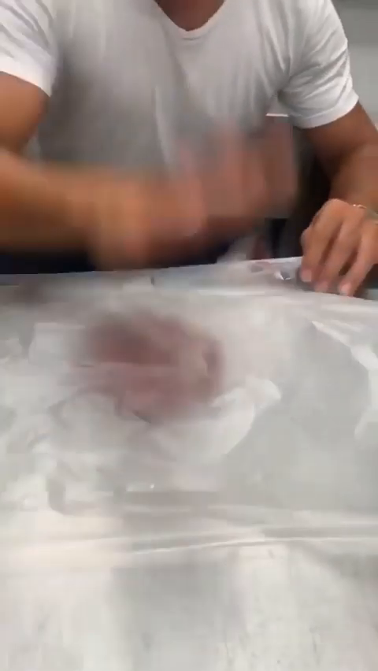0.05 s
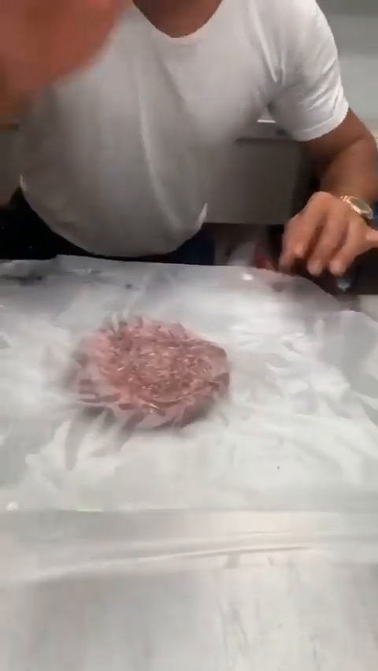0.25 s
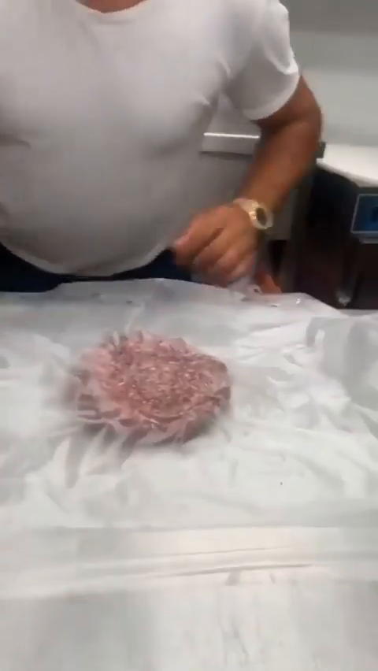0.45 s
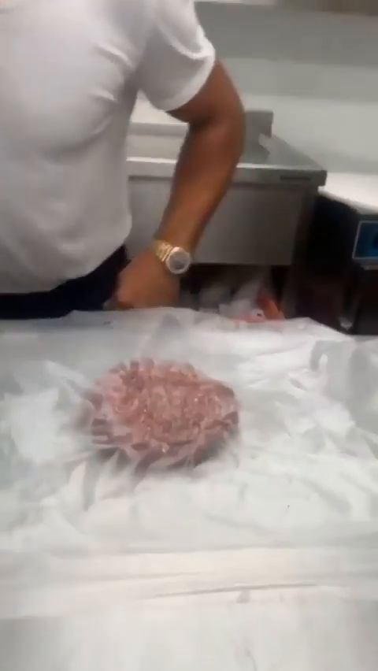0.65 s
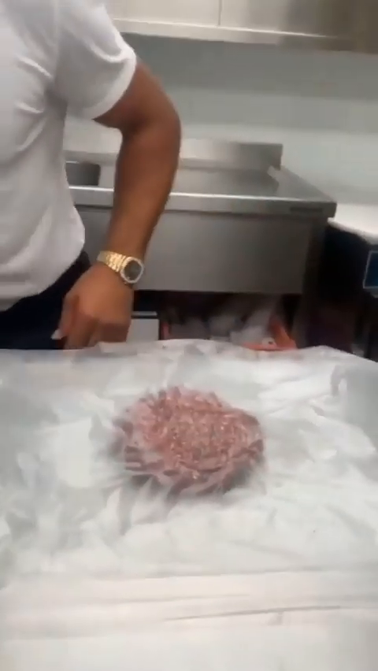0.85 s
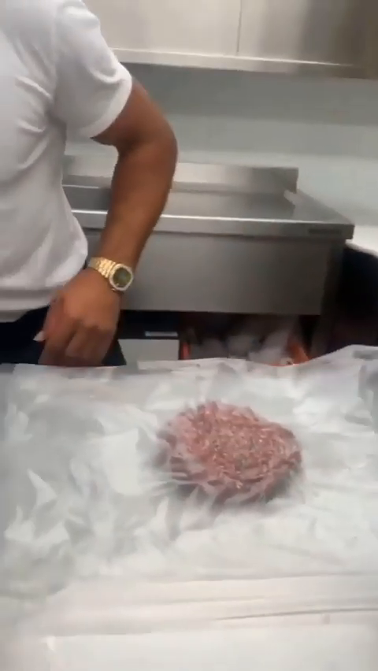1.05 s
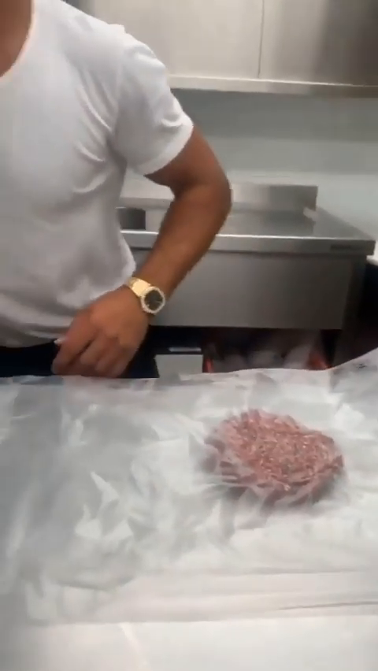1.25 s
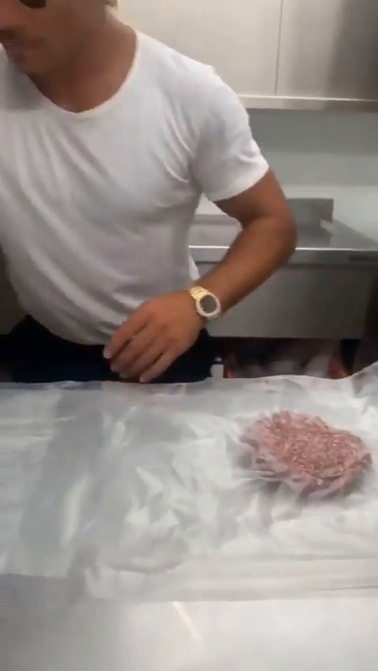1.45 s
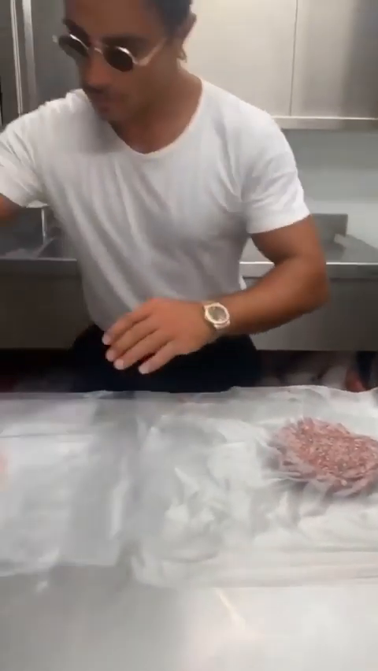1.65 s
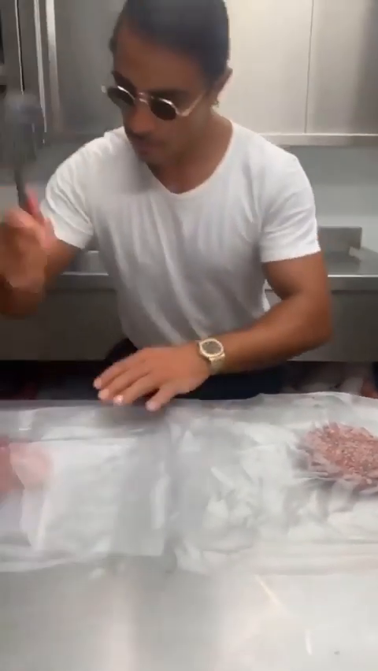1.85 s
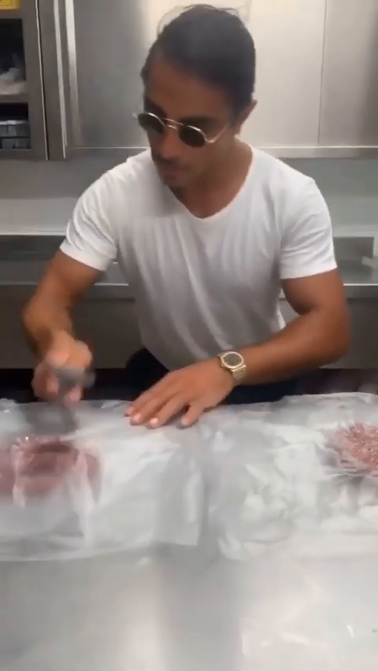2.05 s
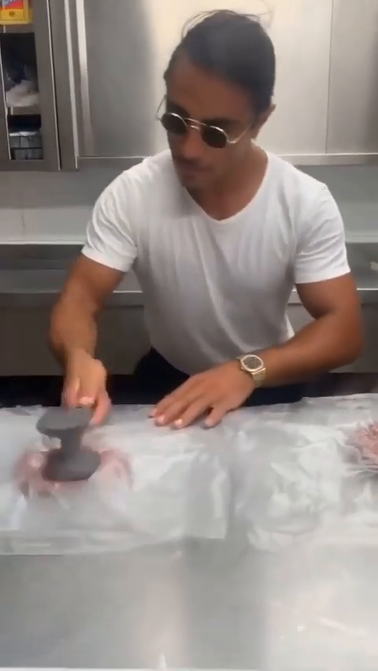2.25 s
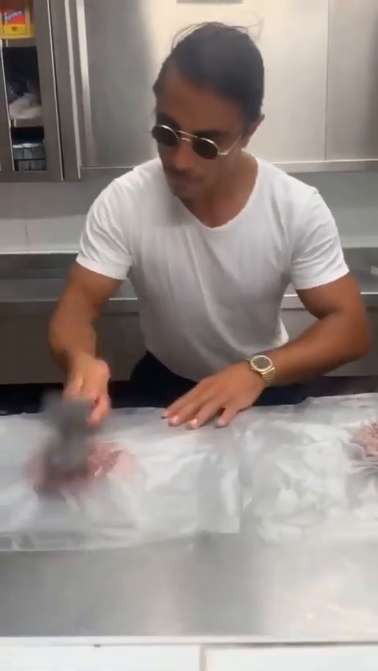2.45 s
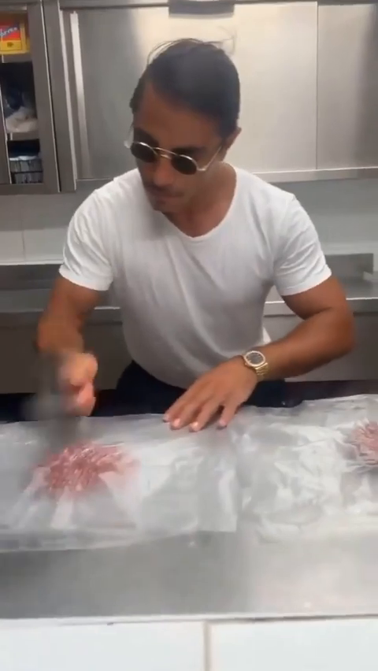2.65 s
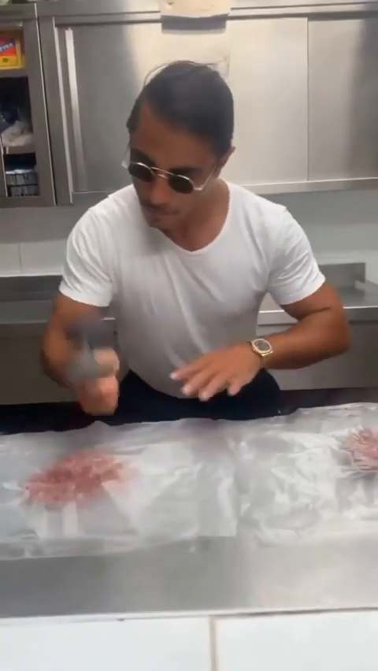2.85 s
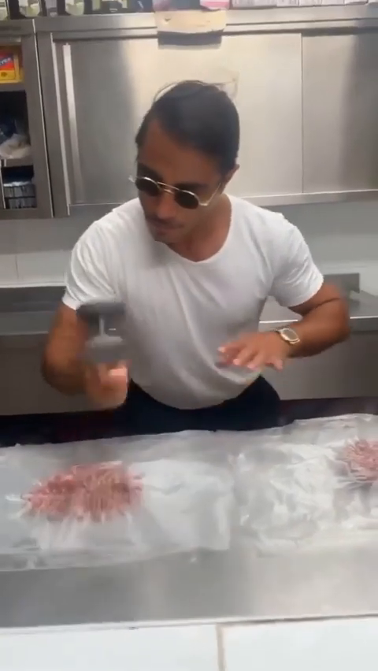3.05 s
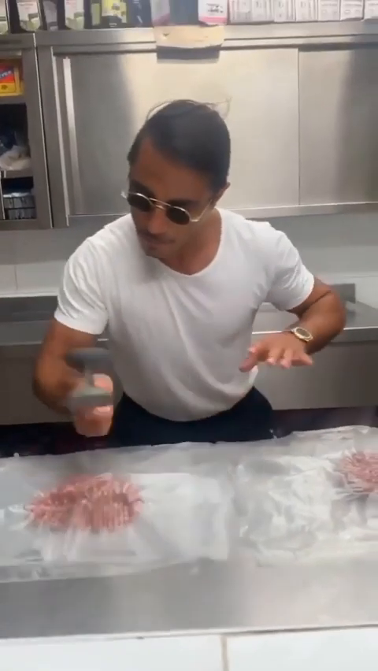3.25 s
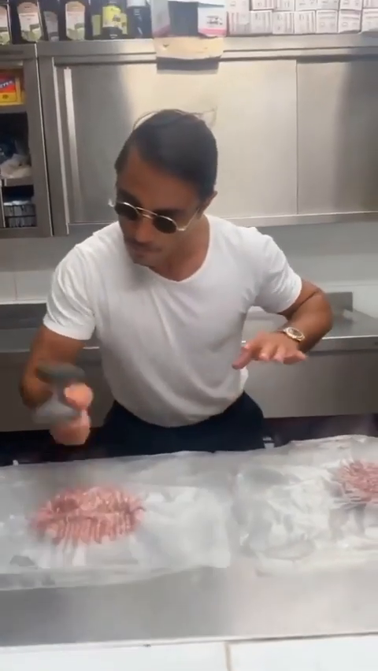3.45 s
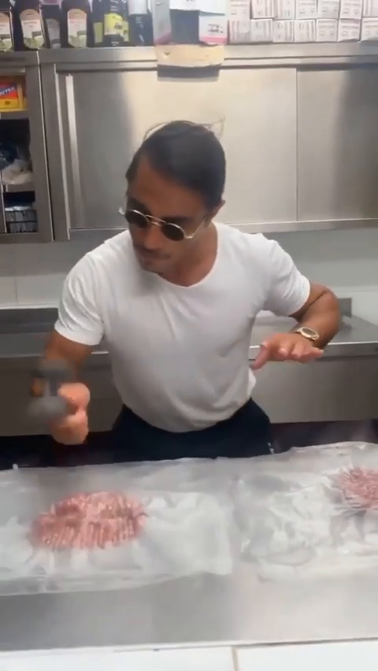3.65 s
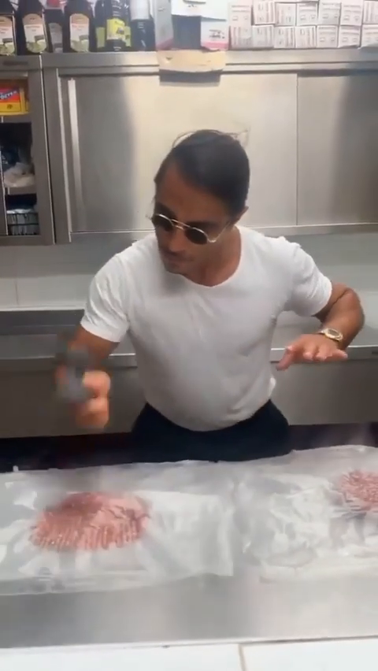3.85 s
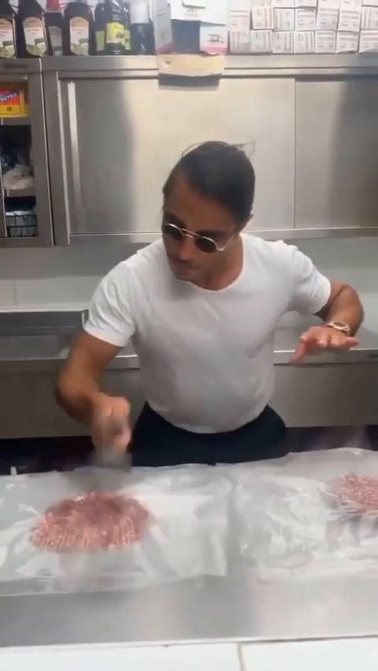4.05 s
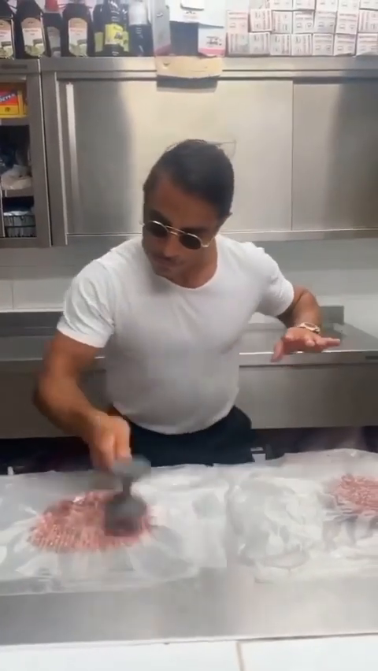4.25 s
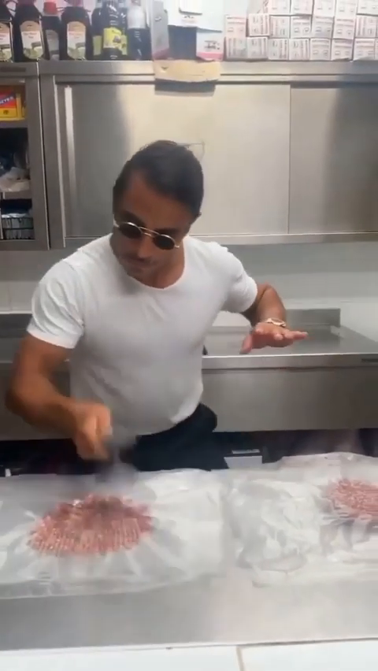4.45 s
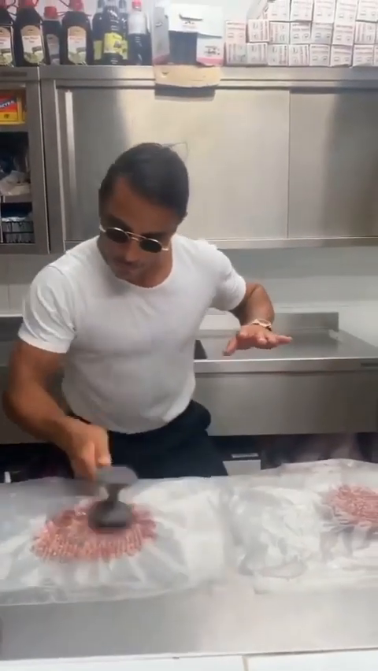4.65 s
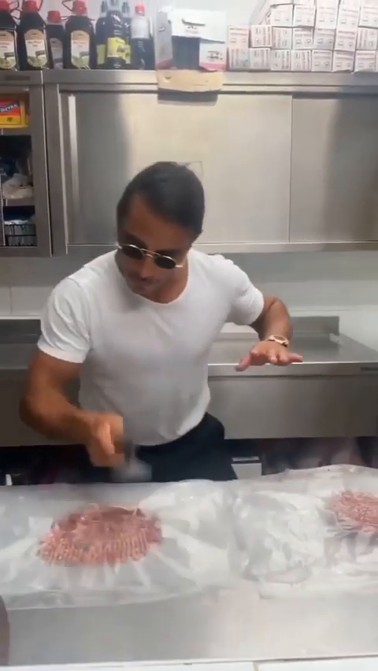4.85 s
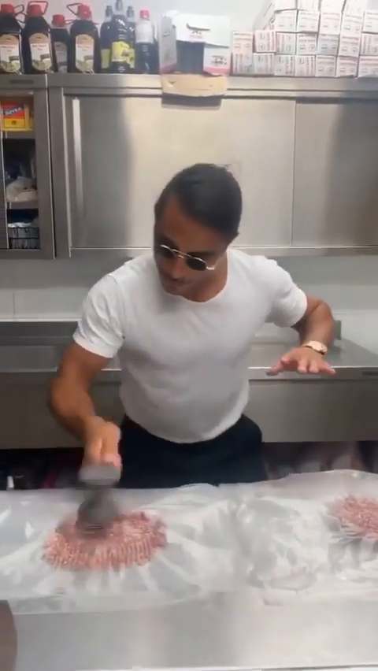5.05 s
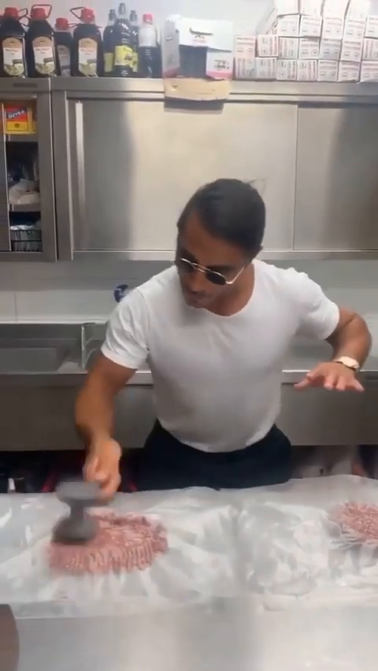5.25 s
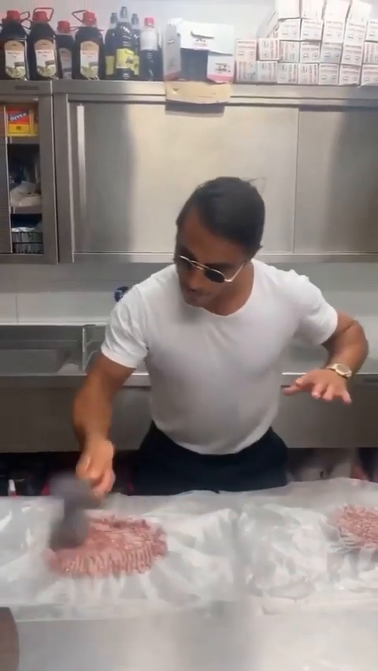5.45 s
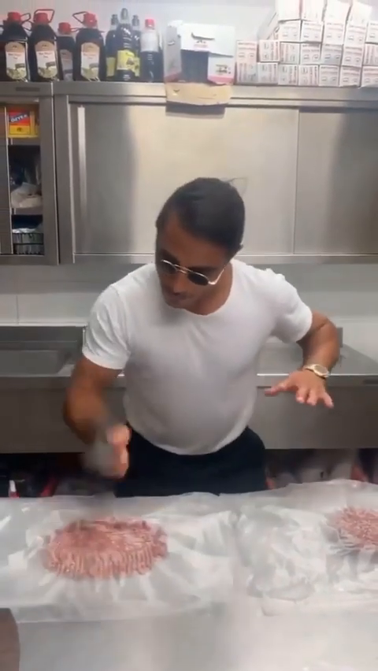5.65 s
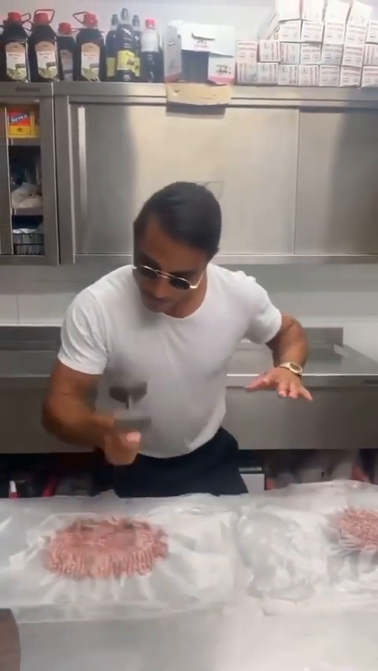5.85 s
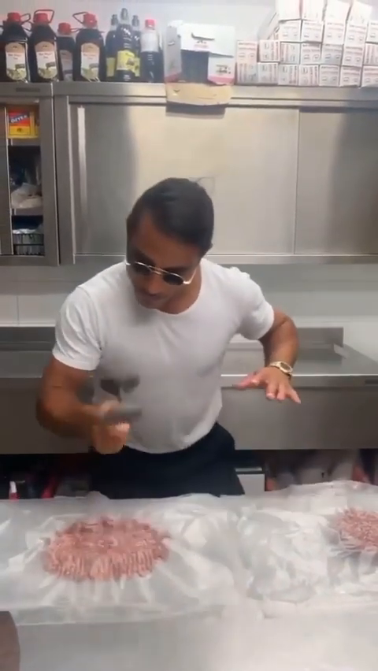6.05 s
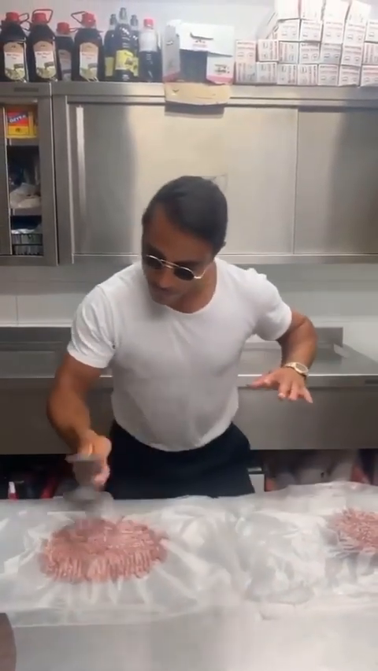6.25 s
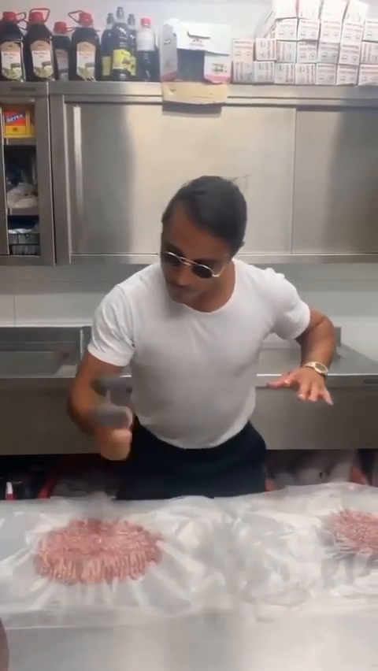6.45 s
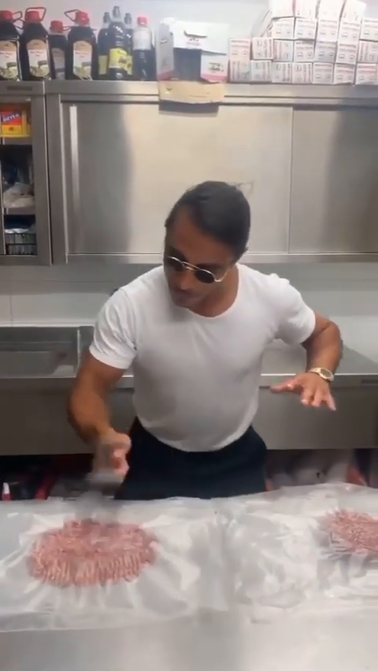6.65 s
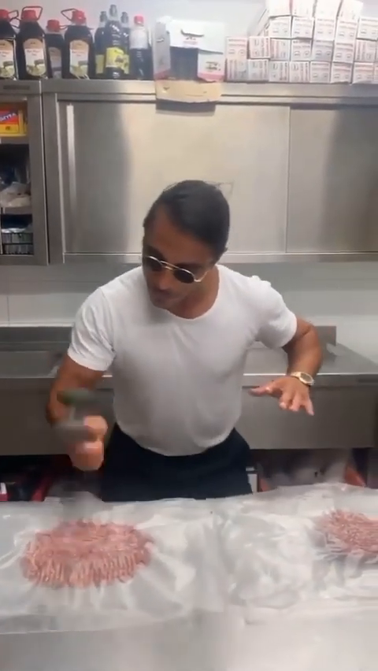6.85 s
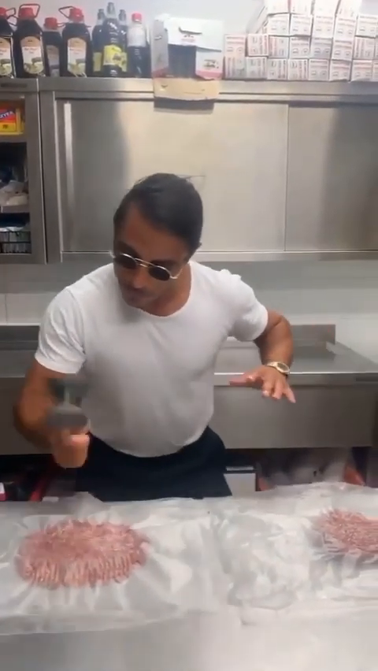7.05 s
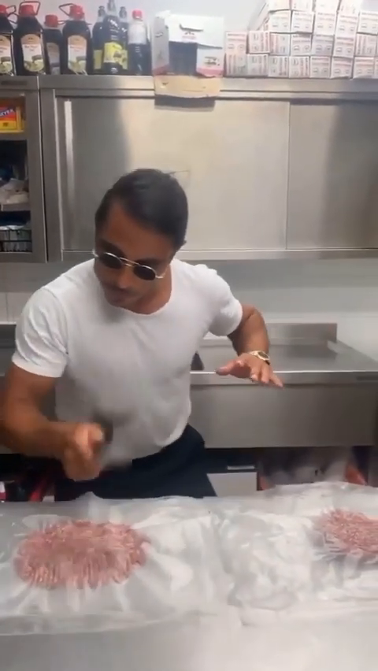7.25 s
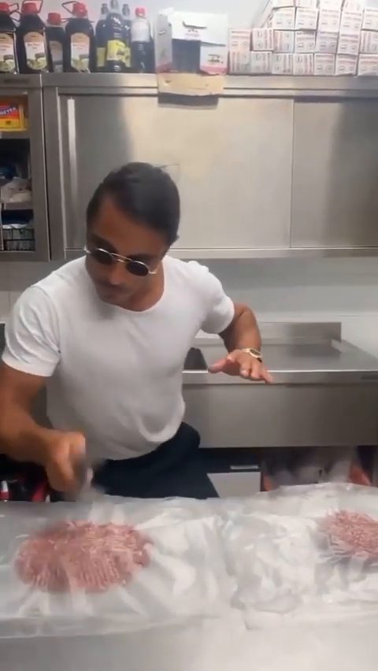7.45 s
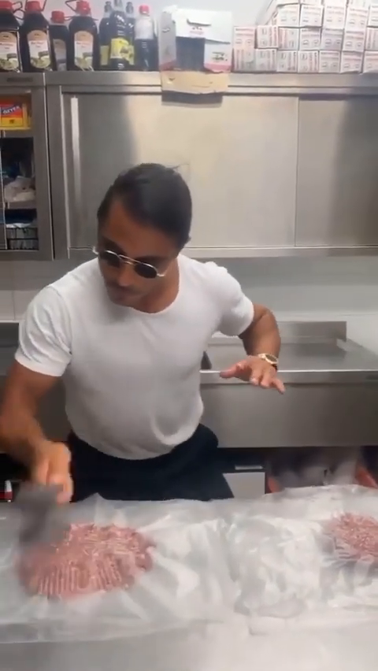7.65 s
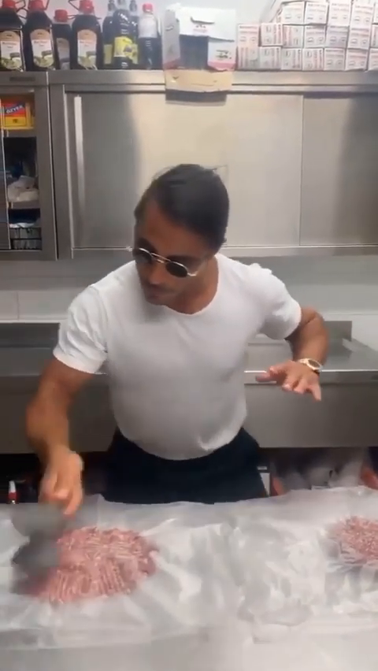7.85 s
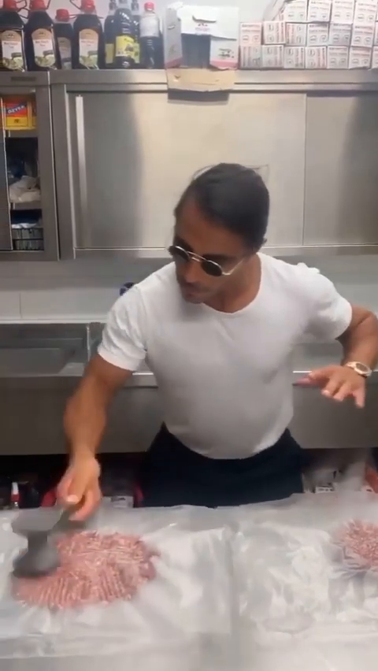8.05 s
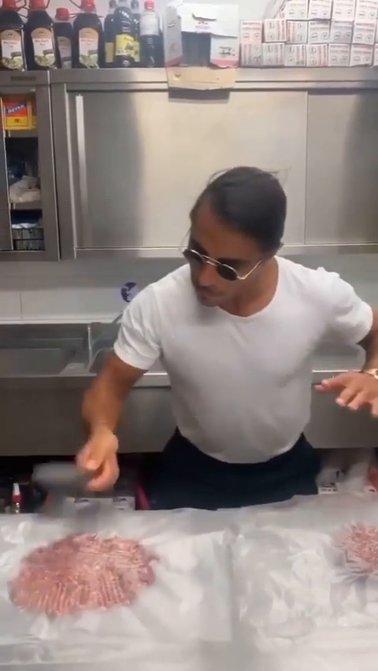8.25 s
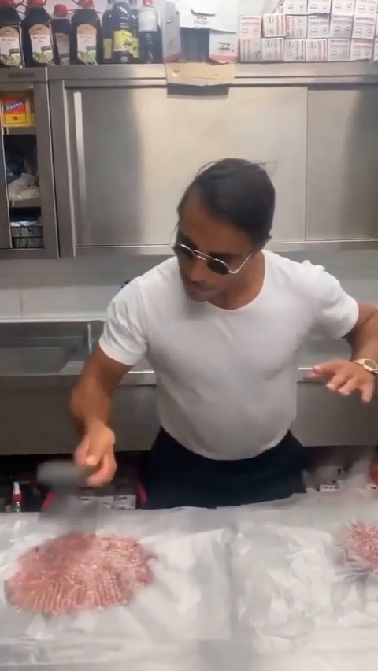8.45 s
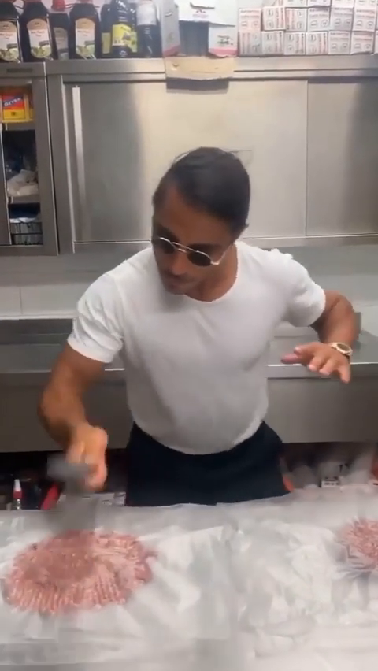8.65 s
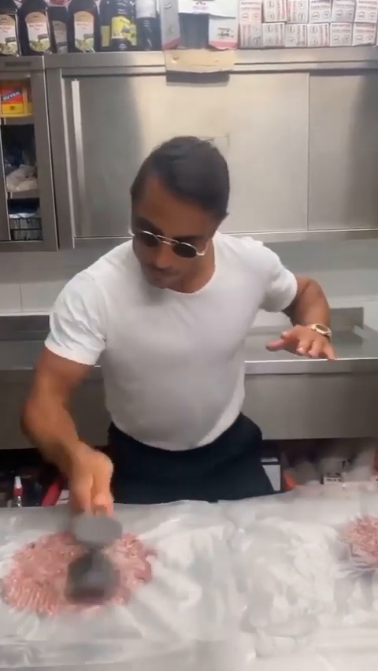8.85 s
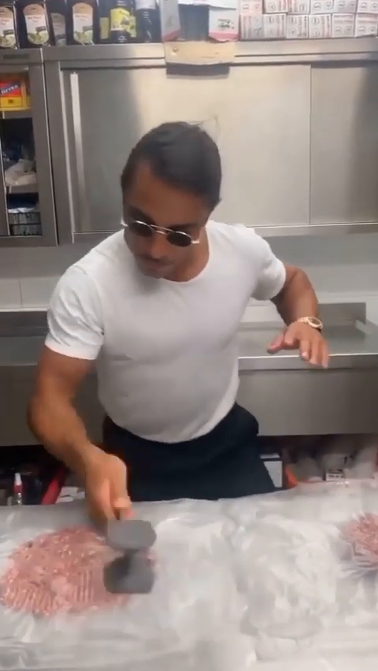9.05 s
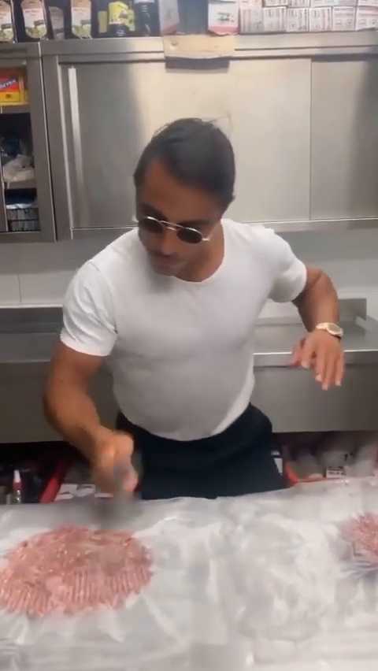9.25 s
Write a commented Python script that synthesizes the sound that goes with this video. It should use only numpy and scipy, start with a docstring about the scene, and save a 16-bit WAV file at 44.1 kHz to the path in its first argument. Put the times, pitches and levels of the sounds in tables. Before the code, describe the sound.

A bare hand slaps wet meat, plastic rustles, then a mallet pounds it on a ringing steel counter in quick, even blows, cooling plant humming.

```python
"""A tiled kitchen from one microphone: cooling plant hums, whines thinly and rushes air (shaped noise) throughout.
Plastic film rustles (swelling noise), a bare hand slaps the meat, a cupboard door knocks, a utensil slides on steel.
Then a mallet pounds ground beef under the film on a steel counter, from 2 s to the end: each blow is a burst of
noise for the slap, a dull thud, low ringing modes for the counter and clustered beats for its chattering panels.
The room answers with tails of decaying noise; loose steel ticks and rings as the counter top rebounds."""
import sys
import numpy as np
from scipy import signal
from scipy.fft import rfft, irfft, next_fast_len
from scipy.io import wavfile
from scipy.ndimage import uniform_filter1d, minimum_filter1d, map_coordinates

SR = 44100
rng = np.random.default_rng(int(sys.argv[2]) if len(sys.argv) > 2 else 0)


def unload_wav(signal):
    """Save mono or channel-first audio to the path in sys.argv[1] as 16-bit WAV at rate SR, clipped to [-1, 1]."""
    wavfile.write(
        sys.argv[1],
        SR,
        np.round(np.clip(np.atleast_2d(signal).T, -1, 1) * 32767).astype(np.int16),
    )


N = 410571


def amp(db):
    """Gain of a level in dB."""
    return 10 ** (np.asarray(db) / 20)


def unit(x):
    """x at rms 1."""
    return x / np.sqrt(np.mean(x ** 2) + 1e-20)


def along(points, hz):
    """Value at hz on a curve of (frequency [Hz], value) points with a log frequency axis."""
    f, v = np.transpose(points)
    return np.interp(np.log(hz + 1), np.log(f + 1), v)


def filtered(x, response):
    """x with its spectrum multiplied by a response of frequency, without phase shift."""
    m = next_fast_len(len(x) + 2048)
    hz = np.fft.rfftfreq(m, 1 / SR)
    return irfft(rfft(x, m) * response(hz), m)[:len(x)]


def noise(spectrum, count):
    """Noise of rms 1, coloured by (frequency [Hz], level [dB]) points."""
    white = rng.standard_normal(count)
    return unit(filtered(white, lambda hz: amp(along(spectrum, hz))))


def narrow(hz, width):
    """A wavering tone: noise in one resonance, rms 1."""
    return unit(filtered(rng.standard_normal(N), lambda f: 1 / (1 + (2 * (f - hz) / width) ** 2)))


def wobble(rate, count=N):
    """A smooth random curve with `rate` knots a second."""
    knots = rng.standard_normal(int(count * rate / SR) + 4)
    return map_coordinates(knots, [np.arange(count) * rate / SR])


def uneven(shape, bands, frames):
    """Random patches of rms 1 over frequency and time, smoothed over so many bands and frames."""
    over_hz = uniform_filter1d(rng.standard_normal(shape), size=bands, axis=0)
    return unit(uniform_filter1d(over_hz, size=frames, axis=1))


def played(rows):
    """Gain per sample of a (time [s], level [dB]) curve, 120 dB down outside it."""
    return amp(np.interp(np.arange(N) / SR, *np.transpose(rows), left=-120, right=-120))


def swell(s, db, rise, fall):
    """Gain per sample of a swell that is 30 dB down one rise before and one fall after its top."""
    shape = 1.25  # 1 pointed, 2 round
    t = np.arange(N) / SR - s
    distance = np.abs(t / np.where(t < 0, rise, fall))
    return amp(np.maximum(db - 30 * distance ** shape, -200))


def add(track, s, sound):
    """Mix a sound into the track at s seconds."""
    part = track[round(s * SR):][:len(sound)]
    part += sound[:len(part)]


def kitchen_air():
    """The rush of air in the kitchen at rest: broadband noise in uneven patches."""
    # air spectrum: (frequency [Hz], relative level [dB])
    air_colour = [(13, -49), (22, -6), (107, -9), (147, -17), (186, -5), (224, -17), (262, -12),
                  (400, -26.5), (610, -28), (2400, -42), (3300, -51), (5740, -49), (12000, -65.5),
                  (15600, -107), (22000, -120)]
    air_db = -33
    z = signal.stft(noise(air_colour, count=N), nperseg=512)[2]
    patchy = signal.istft(z * amp(1.5 * uneven(z.shape, 5, 14)), nperseg=512)[1][:N]
    return amp(air_db) * unit(patchy)


def cooling_plant():
    """Compressors and fans: narrow noise resonances hum low down, and a thin high whine comes and goes."""
    # hum tones: (frequency [Hz], width [Hz], level [dB])
    hum_tones = [(61.4, 1.2, -37.5), (108.8, 4.3, -42.5), (180.5, 7.9, -46), (255.8, 12, -45)]
    # the thin whine: (time [s], level [dB])
    whine_levels = [(0, -72), (.9, -73), (1.3, -66), (1.75, -67), (1.85, -57), (2.2, -59), (2.4, -71),
                    (9.31, -64)]
    whine_hz = 5690
    wandering = np.sin(2 * np.pi * whine_hz * np.arange(N) / SR + 1.1 * wobble(15))
    whine = played(whine_levels) * unit(narrow(whine_hz, 20) + 1.5 * wandering)
    return whine + sum(amp(db) * narrow(hz, width) for hz, width, db in hum_tones)


def film():
    """The plastic sheet swishes: swelling noise whose quick random level gives a slight crackle."""
    # swishes: (time of the top [s], level at the top [dB], rise [s], fall [s])
    swishes = [(.088, -43, .04, .004), (.894, -47.5, .035, 0.15), (1.19, -55, .12, .2),
               (1.69, -48.5, .16, 0.17), (1.943, -39, .03, 0.088)]
    # film spectrum: (frequency [Hz], relative level [dB])
    film_colour = [(880, -31), (1500, -8), (2490, -13), (2750, -14), (4020, -8.5), (4600, -9), (13000, -25)]
    crackle = amp(1.1 * wobble(170))
    return sum(swell(*row) for row in swishes) * crackle * noise(film_colour, count=N)


def slap(colour, landing_ms, dies_ms, flesh_db, lumpy_db):
    """Film and wet meat crack: squeezed air hisses ahead, the face lands in a rising burst, then it dies fast."""
    lump_hz = 596  # spacing of the random lumps in each slap's colour
    t = np.arange(SR // 20) / SR - .02  # the blow lands at t = 0
    landing = np.exp(np.minimum(t, 0) / (max(landing_ms, .3) / 1000))
    hiss = amp(-27.0) * np.exp(t / 0.0072)
    envelope = np.where(t < 0, landing + hiss, np.exp(-1000 * t / dies_ms))
    lumps = rng.standard_normal(100)

    def flesh(hz):
        """Response: the part below about 1600 Hz is set by flesh_db, with uneven lumps all over."""
        low_db = flesh_db / (1 + (hz / 1600) ** 4)
        return amp(low_db + lumpy_db * map_coordinates(lumps, [hz / lump_hz], mode="wrap"))

    return envelope * filtered(noise(colour, count=len(t)), flesh)


def room(x):
    """The kitchen's answer: a fresh diffuse tail of energy 1, each frequency dying at its own speed."""
    # reverberation: (frequency [Hz], t60 [s])
    decay_times = [(200, 0.45), (740, 0.45), (2000, 0.5), (5000, 0.49), (13500, 0.32)]
    hz, t, z = signal.stft(rng.standard_normal(SR * 2 // 5), SR, nperseg=256)
    decay_db = -60 * t / along(decay_times, hz)[:, None]
    tail = signal.istft(z * amp(2.33 * uneven(z.shape, 3, 9) + decay_db), SR, nperseg=256)[1]
    tail *= 1 - np.exp(-np.arange(len(tail)) / SR / 0.00047)  # the reflections take a moment to build up
    return signal.fftconvolve(x, tail / np.linalg.norm(tail))


def thud():
    """The meat is squashed flat on steel: a short dull burst of noise right behind the slap."""
    # thud spectrum: (frequency [Hz], relative level [dB])
    thud_colour = [(120, -18), (250, -2), (550, -8), (1000, -7), (2200, -10), (5000, -48)]
    rise_s, decay_s = .0015, 0.0097
    t = np.arange(SR // 12) / SR
    return (1 - np.exp(-t / rise_s)) * np.exp(-t / decay_s) * noise(thud_colour, count=len(t))


def chatter(bright_db):
    """Loose panels beat against the frame while the top swings wide: short knocks, thinning out and weakening."""
    # panel spectrum: (frequency [Hz], relative level [dB])
    panel_colour = [(150, 5), (250, 5.5), (468, 0), (544, -0.5), (949, -6), (1040, -4.5), (1390, -5.5),
                    (1560, -8.5), (1930, -11.5), (2890, -21.5), (4000, -30), (5200, -41), (8800, -120)]
    build_ms = 3.7
    draw = rng.random((30, 2))
    when = -.035 * np.log(1 - .95 * draw[:, 0])  # [s], crowded at the start
    size = amp(-14 * draw[:, 1] - 60 * when / .5)
    size *= 1 - np.exp(-when / (build_ms / 1000))
    t = np.arange(SR // 30) / SR
    hits = np.bincount((when * SR).astype(int), size, SR // 4)
    beats = signal.fftconvolve(hits, t * np.exp(-t / 0.0015))[:SR // 4]
    thin = lambda hz: amp(bright_db / (1 + (1900 / (hz + 1)) ** 4))  # thin sheets set the top
    return unit(filtered(beats * noise(panel_colour, count=SR // 4), thin))


def counter(group_db):
    """The steel top rings in damped modes; the spot that is hit sets the strength of each group of modes."""
    # counter modes: (frequency [Hz], relative level [dB], t60 [s], build-up [s],
    #                 direction and size of the first swing [factor on the level])
    modes = [(29, -2.5, 0.45, 0.0056, 0.4), (44, -27, 0.41, .004, -5), (52.5, -7, 0.73, 0.0067, 0.7),
             (65, 6.5, 0.56, 0.0038, 0.92), (84.24, -1, 0.61, 0.0047, 1.01),
             (98.15, -3.5, 0.75, 0.0041, 0.94), (129.1, 5, 0.51, 0.037, 1.27),
             (151.7, 2.5, 0.8, 0.007, -0.42), (161.4, -4, 0.25, 0.00088, -2.5),
             (181.2, 0, 0.45, 0.0035, -1.3), (197.5, -2.5, 0.5, 0.022, 0.95),
             (212, 4.5, 0.26, 0.0018, 0.64), (246.6, -3, 0.76, 0.0009, 0.22),
             (274.7, -2.5, 0.52, 0.0021, 0.19), (320, -18, 0.26, 0.0056, -1.7),
             (376, -13.5, 0.35, 0.00061, 0.83)]
    # borders between the deep, low, middle and high groups: frequency [Hz]
    group_borders = [110, 140, 230]
    t = np.arange(SR * 2 // 5) / SR
    hz, db, t60, build, swing = np.transpose(modes)[:, :, None]
    spot = rng.standard_normal((2, len(hz), 1))  # each blow varies levels and phases
    strength_db = np.array(group_db)[np.digitize(hz, group_borders)]
    gain = swing * amp(db + strength_db + 1.34 * spot[0])
    phase = 2 * np.pi * hz * t + hz / 400 * spot[1]
    return np.sum(gain * (1 - np.exp(-t / build)) * amp(-60 * t / t60) * np.sin(phase), axis=0)


def blows():
    """Hand slap, then mallet: slap, thud, panels and push into the counter; harder blows fill the room more."""
    # the bare hand, then the mallet: (time [s], relative slap level [dB], landing time constant [ms],
    #   low half of the slap [dB], counter modes: deep [dB], low [dB], middle [dB], high [dB],
    #   relative chatter level [dB])
    hand_blow = [(.1016, -2, 2.1, 1, -15.5, -24, -19.5, -2.1, -18.5)]
    mallet_blows = [(2.0117, -5, 1.4, -15.5, -16.5, -35, -40, -26, -27),
                    (2.2711, -4, 1.2, -11, -17, -39, -26.5, -20, -25.5),
                    (2.4903, -5, 0.96, -5, -15, -37, -21, -6.5, -23.5),
                    (2.7063, -8, 0.8, 0.5, -11, -21, -17.5, -12.5, -14.5),
                    (2.9247, -3, 1.4, -10, -10.5, -16, -25.5, -15.5, -19.5),
                    (3.1551, -7, 1.1, -5.5, -13.5, -11.5, -10, -13, -8.5),
                    (3.363, -6.5, 1.6, -17, -11.5, -18, -13.5, -26, -17),
                    (3.5668, -7, 0.97, -8, -11.5, -24, -9.5, -19, -11.5),
                    (3.7724, -3, 0.9, -11, -13.5, -15, -17.5, -27, -16.5),
                    (4.0008, 0.5, 0.72, -13.5, -12.5, -21, -17, -29, -17.5),
                    (4.2396, -5, 1.6, -12, -11, -13.5, -13, -20, -16),
                    (4.4129, -9, 2.2, -5.5, -11.5, -10, -13, -11.5, -15.5),
                    (4.638, -1.5, 0.88, -10, -11.5, -15, -18.5, -31, -17),
                    (4.8022, -11, 1.7, -10, -13.5, -15, -20, -18, -23),
                    (5.022, -2.5, 1.9, -11, -13.5, -18, -17.5, -22, -15.5),
                    (5.252, -3, 1.14, -1, -13.5, -15, -16.5, -11, -8.5),
                    (5.4896, -8, 0.33, -8, -14.5, -14, -16.5, -28, -6),
                    (5.7197, -6.5, 0.58, 4.5, -11, -13, -15, -23, -7.5),
                    (5.9445, 1, .77, -2, -10.5, -12, -13, -18, -8.5),
                    (6.174, -1, 2.1, -4, -13, -12.5, -16, -8, -13.5),
                    (6.325, -11, 1.3, -14, -18, -17.5, -20.5, -17, -20.5),
                    (6.5509, -6, 1.5, -8, -11.5, -12, -15.5, -12, -9),
                    (6.7238, -11, 1.2, -4.5, -13.5, -12, -17, -20, -14.5),
                    (6.9504, -2.5, 0.71, 0, -14.5, -17, -14, -5, -8.5),
                    (7.1776, -3.5, 0.6, -13, -11, -14, -12.5, -31, -11),
                    (7.4006, -3, .8, -7.5, -12.5, -11, -10, -11, -6.5),
                    (7.621, -1, 1.1, -3, -10, -15, -11, -31, -14),
                    (7.8348, 0.5, 0.66, -3.5, -13, -9.5, -10.5, -6, -5),
                    (8.0618, -0.5, 0.39, -11, -11.5, -21, -12.5, -12, -8.5),
                    (8.2081, -6, 0.55, -3, -13.5, -16, -17, -4, -11.5),
                    (8.4187, -8, 0.9, 5, -15.5, -13, -14.5, -13, -8),
                    (8.6095, -1.5, .44, -8, -11, -15.5, -16, -13, -12),
                    (8.8417, -1.5, .56, -3, -12.5, -17.5, -11, -17, -4.5),
                    (9.078, -3, 1.1, -12, -11, -9.5, -8.5, -12.5, -12),
                    (9.3064, -2, 0.48, -19, -25, -27, -31, -38, -21)]
    # slap spectra of mallet and hand: (frequency [Hz], relative level [dB])
    mallet_colour = [(240, -29), (400, 11.5), (1150, 5), (2100, -2), (2610, -12), (4600, -8), (5370, -15),
                     (7190, -3.5), (9330, -11), (11200, -21), (14300, -21), (15700, -37)]
    palm_colour = [(240, -32), (400, 7.5), (1020, -18), (1670, 6), (2530, -9.5), (3600, 2.5), (4750, -21),
                   (7300, -3), (14600, -32), (15700, -41)]
    # the slaps as the walls return them, mallet and hand: (frequency [Hz], relative level [dB])
    mallet_echo = [(1180, -7), (2000, 1.5), (2610, -8), (3840, -1), (4880, -8.5), (6690, -1.5),
                   (9270, -5.5), (12400, -18.5), (14500, -15.5), (15500, -69)]
    palm_echo = [(350, -32), (600, -2), (855, -27), (1430, -9), (4880, -12.5), (8180, -6.5), (12500, -23),
                 (13500, -19), (14300, -25), (15500, -97)]
    mallet_dies_ms, palm_dies_ms = 2.32, 1.4
    mallet_bright_db, hand_dull_db = -1.5, -37  # top of the chatter
    lumpy_db = 3.5  # uneven colour of the mallet slaps
    room_db, hand_room_db = 11.5, 4.5  # slap in the room; extra for the hand
    room_per_slap, room_per_chatter = .4, 0.3  # [dB per dB]
    push_lag_ms = 4.13  # the push comes behind the slap
    thin_db, sooner_ms_per_db = -17, 0.23  # on thin meat the middle modes pass thin_db and the push comes sooner
    thud_db = -6  # over the chatter column
    out = np.zeros(N)
    for k, (s, slap_db, landing_ms, flesh_db, *group_db, chatter_db) in enumerate(hand_blow + mallet_blows):
        by_mallet = k > 0
        wet_db = room_db + room_per_slap * slap_db + room_per_chatter * chatter_db
        if by_mallet:
            crack = slap(mallet_colour, landing_ms, mallet_dies_ms, flesh_db, lumpy_db)
            echo, bright_db = mallet_echo, mallet_bright_db
        else:
            crack = slap(palm_colour, landing_ms, palm_dies_ms, flesh_db, 0)
            echo, bright_db = palm_echo, hand_dull_db
            wet_db += hand_room_db
        pulse = filtered(signal.unit_impulse(512, 128), lambda hz: amp(along(echo, hz)))
        tail = room(pulse / np.linalg.norm(pulse))
        clatter = amp(chatter_db - 11) * chatter(bright_db)
        lag_ms = push_lag_ms - sooner_ms_per_db * max(group_db[2] - thin_db, 0)
        add(out, s - .02, amp(slap_db) * crack)  # starts early with the hiss
        add(out, s, amp(wet_db + 0.66 * wobble(68.0, count=len(tail))) * tail)
        add(out, s + 0.001094, amp(chatter_db + thud_db) * thud())
        add(out, s + 0.00399, clatter)
        add(out, s + 0.003977, amp(-2) * room(clatter))
        add(out, s + lag_ms / 1000, counter(group_db))
    return out


def door():
    """A cupboard door bumps shut on a soft stop: a small tick, then its panel swells and rings briefly."""
    # shuts: (time [s], relative level [dB])
    shuts = [(0.89, -16)]
    # door panel modes: (frequency [Hz], relative level [dB], t60 [s])
    door_modes = [(265, 8.5, 0.046), (370, -2, 0.044), (536, 2, 0.042), (794, -2, 0.04), (1150, -2, 0.036),
                  (1560, -9, 0.026), (1900, -11, 0.038), (2220, -19, 0.044)]
    tick_colour = [(300, 0), (2100, 5), (9000, -23)]
    body_colour = [(150, -8), (300, 5), (1200, -7), (2300, -19), (5000, -48)]
    out, t = np.zeros(N), np.arange(SR // 4) / SR
    for s, db in shuts:
        ring = np.zeros(len(t))
        for k, (hz, level, t60) in enumerate(door_modes):
            ring += (-1) ** k * amp(level - 60 * t / t60) * np.sin(2 * np.pi * hz * t)
        bump = (1 - np.exp(-t / 0.0021)) * ring
        bump += 0.31 * np.exp(-t / 0.003) * noise(tick_colour, count=len(t))
        body_envelope = (1 - np.exp(-t / 0.0036)) * np.exp(-t / 0.015)
        bump += 0.5 * body_envelope * noise(body_colour, count=len(t))
        add(out, s, amp(db - 3.5) * bump)
        add(out, s, amp(db - 4.5) * room(bump))
    return out


def scrape():
    """A utensil slides once on steel, catching as it goes: resonances and noise under a quick random level."""
    # slide: (time of the top [s], level at the top [dB], rise [s], fall [s])
    slide = [(1.178, -39.5, 0.11, 0.17)]
    # resonances of what slides: (frequency [Hz], width [Hz], relative level [dB])
    resonances = [(1053, 110, 2), (1420, 270, 3), (1780, 150, -2), (3330, 150, -11), (4030, 200, -17),
                  (4460, 120, -17)]
    grit_colour = [(600, -30), (1000, 0), (2000, -2), (2600, -15), (5000, -22), (8000, -50)]
    slid = sum(amp(db) * narrow(hz, width) for hz, width, db in resonances)
    slid += amp(-3) * noise(grit_colour, count=N)
    return swell(*slide[0]) * unit(amp(1.9 * wobble(120)) * slid)


def knocks():
    """Loose steel ticks as the top rebounds, ringing a bracket briefly in two modes, with a hollow body."""
    # knocks, some 15 to 50 ms after a blow: (time [s], relative level [dB], pitch [Hz])
    rebounds = [(2.967, -10, 1370), (3.403, -16, 1400), (3.792, -4.5, 1260), (3.815, -13.5, 1330),
                (4.021, -10.5, 1020), (4.281, -11.5, 1270), (4.678, -16, 1300), (5.269, -4, 1230),
                (5.534, -3, 1220), (5.76, -6.5, 1110), (6.193, -5.5, 1370), (6.743, -11, 1320),
                (6.967, -2.5, 1224), (6.991, -4, 1110), (7.197, -13, 1070), (7.656, -7.5, 1360),
                (7.879, -6, 1285), (8.079, -2.5, 1270), (8.107, -2.5, 1110), (8.225, -9, 1270),
                (8.435, -1, 1240), (8.459, -3.5, 1110), (8.627, -2.5, 1260), (8.649, -7, 1200),
                (8.889, -5, 1570), (9.119, -4.5, 1230), (9.128, -13, 1250)]
    body_db = -20.5  # the same in every knock
    upper_db, hard_db, upper_grows = -19.5, -5.5, 5.8  # upper mode; it gains 5.8 dB for each dB over hard_db
    tick_colour = [(500, -16), (1400, 27), (3200, 8.5), (9000, -47)]
    body_colour = [(120, 3), (260, 9.0), (550, -6.0), (1100, -4.0), (2500, -54.5)]
    out, t = np.zeros(N), np.arange(SR // 10) / SR
    for s, db, hz in rebounds:
        ring = 1.65 * np.exp(-t / 0.0055) * np.sin(2 * np.pi * hz * t)
        top_db = upper_db + upper_grows * max(db - hard_db, 0)
        ring += amp(top_db) * np.exp(-t / .0015) * np.sin(2 * np.pi * 3000 * t)
        tick = 0.59 * np.exp(-t / 0.0043) * noise(tick_colour, count=len(t))
        body = amp(body_db) * np.exp(-t / 0.017) * noise(body_colour, count=len(t))
        add(out, s, amp(db - 8.0) * (ring + tick) + body)
        add(out, s, room(amp(db - 4.0) * tick + body))
    return out


def scene():
    """All sources at one microphone."""
    background = kitchen_air() + cooling_plant()
    return (background + film() + blows() + door() + scrape() + knocks())[None]


def record(dry):
    """A limiter holds the peaks down by smoothed gain; then nothing passes above the band limit."""
    top_hz = 15800
    need = np.minimum(1, .98 / (np.abs(dry[0]) + 1e-9))
    gain = uniform_filter1d(minimum_filter1d(need, size=221), size=111)  # [samples], eased around each peak
    return np.clip(filtered(dry[0] * gain, lambda hz: hz < top_hz), -1, 1)[None]


dry = scene()
out = record(dry)
unload_wav(out)
```